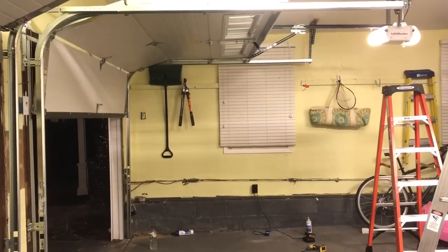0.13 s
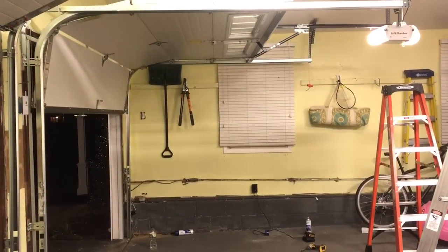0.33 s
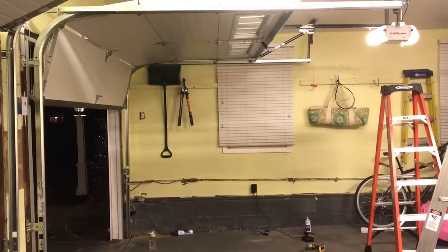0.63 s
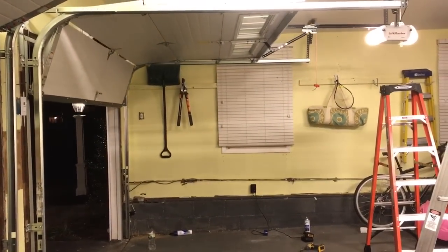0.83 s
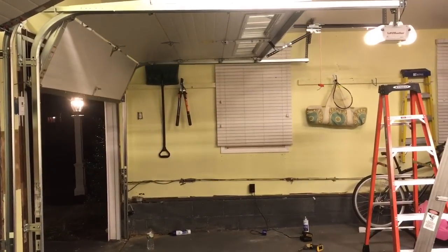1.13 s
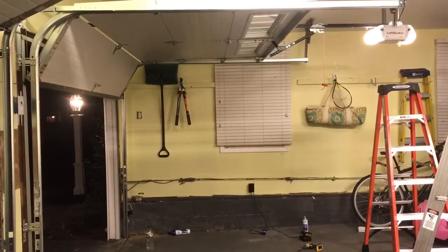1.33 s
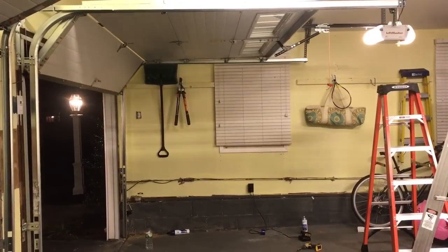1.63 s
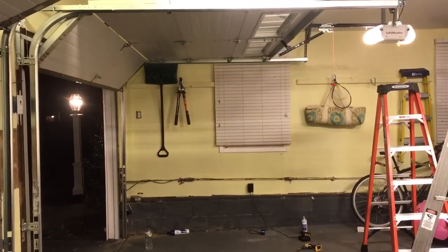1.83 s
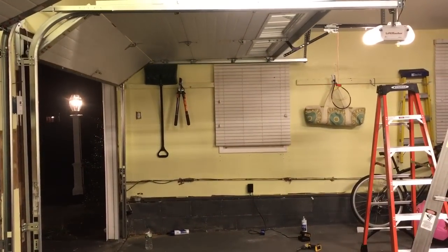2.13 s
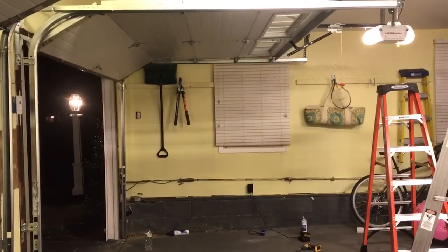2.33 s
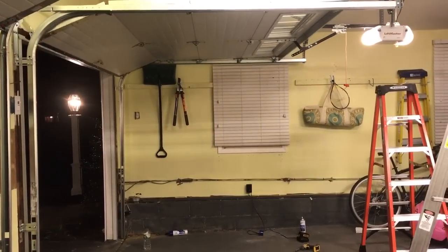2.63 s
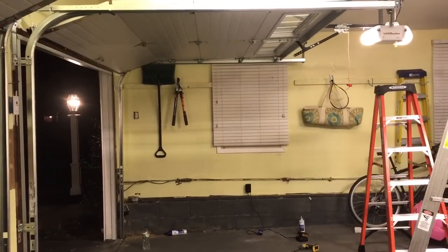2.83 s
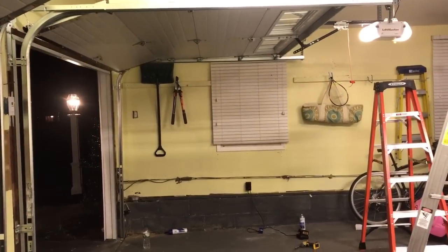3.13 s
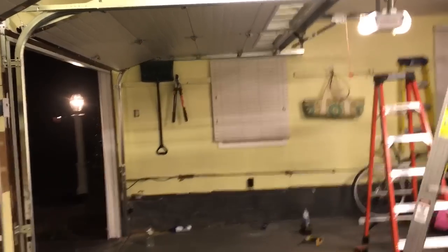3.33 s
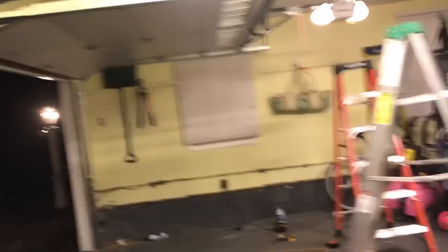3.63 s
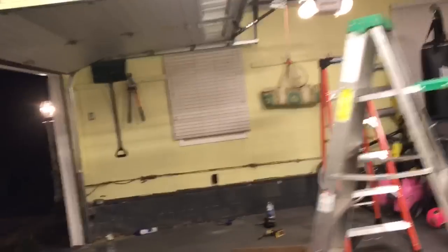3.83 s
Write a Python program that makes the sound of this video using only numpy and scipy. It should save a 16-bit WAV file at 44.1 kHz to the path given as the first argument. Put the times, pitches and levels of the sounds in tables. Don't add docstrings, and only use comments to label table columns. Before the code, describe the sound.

A motorised sectional garage door hums and rattles up its tracks, clanks, then stops.

```python
import sys
import numpy as np
from scipy import signal
from scipy.fft import rfft, irfft, next_fast_len
from scipy.io import wavfile
from scipy.ndimage import uniform_filter1d, map_coordinates

SR = 44100
rng = np.random.default_rng(int(sys.argv[2]) if len(sys.argv) > 2 else 0)


def how_loud(loudness_db):
    steps = np.asarray(loudness_db, float) / 20
    return 10 ** steps


def generate_wav(sig):
    pcm = np.round(np.clip(np.atleast_2d(sig).T, -1, 1) * 32767).astype(np.int16)
    wavfile.write(sys.argv[1], SR, pcm)


N = 176400
OFF_S = 2.875


def unit(x):
    return x / np.sqrt(np.mean(x ** 2) + 1e-20)


def along(points, hz):
    f, v = np.transpose(points)
    return np.interp(np.log(hz + 1), np.log(f + 1), v)


def curve(rows):
    return np.interp(np.arange(N) / SR, *np.transpose(rows))


def wobble(rate_hz):
    knots = rng.standard_normal(int(N * rate_hz / SR) + 4)
    return map_coordinates(knots, [np.arange(N) * rate_hz / SR])


def filtered(x, response):
    m = next_fast_len(len(x) + 8192)
    return irfft(rfft(x, m) * response(np.fft.rfftfreq(m, 1 / SR)), m)[:len(x)]


def resonance(hz, centre_hz, width_hz):
    return 1 / (1 + ((hz - centre_hz) / width_hz * 2) ** 2)


def peaks_db(rows, hz):
    return sum(db * resonance(hz, c, w) for c, w, db in rows)


def patchy(patchy_db=1.1):
    z = signal.stft(rng.standard_normal(N), nperseg=512)[2]
    field = uniform_filter1d(rng.standard_normal(z.shape), size=9, axis=1)
    field = uniform_filter1d(field, size=5, axis=0)
    return signal.istft(z * how_loud(patchy_db * unit(field)), nperseg=512)[1][:N]


def powered(off_s):
    rundown_t60_s = 0.048
    return how_loud(-60 * np.clip(np.arange(N) / SR - off_s, 0, None) / rundown_t60_s)


def motor_tone(hz, db, flutter_db):
    level = how_loud(db + flutter_db * wobble(14))
    sway_rad = 0.094 * flutter_db * wobble(8.7) + rng.uniform(0, 2 * np.pi)
    return level * np.sin(2 * np.pi * hz * np.arange(N) / SR + sway_rad)


MAINS_HZ = 119.9
# (multiple, level [dB])
HUM_OVERTONES = [(1, 0), (2, -18.5), (3, -29), (4, -34.5), (6, -37.5)]
# (time [s], level [dB])
HUM_LOAD = [(0.0, -32.5), (0.04, -33), (0.09, -35.5), (0.22, -34), (1.7, -32), (1.85, -31), (2.1, -30.5),
            (2.79, -33), (2.86, -34)]


def motor_hum():
    hum = sum(motor_tone(k * MAINS_HZ, db, 0.5 if k == 1 else 1.5) for k, db in HUM_OVERTONES)
    return np.sqrt(2) * how_loud(curve(HUM_LOAD)) * hum * powered(OFF_S)


# (time [s], level [dB])
WHINE_SWELL = [(0.0, -54.5), (0.45, -60), (0.47, -56), (1.34, -59.5), (1.45, -66), (1.92, -55.5),
               (2.06, -63), (2.18, -56), (2.82, -59)]


def slot_whine():
    whine_hz, shaft_hz, whine_db, side_tone_db = 1405, 29.4, -57.5, -15.5
    warble_rad, drift_rad, beat_depth = 0.72, 0.3, 0.45
    beat_peak_s, beat_span_s = 1.85, 0.45
    t = np.arange(N) / SR
    swell_db = curve(WHINE_SWELL)
    turn = 2 * np.pi * shaft_hz * t + 0.5 * wobble(1.95)
    bend = np.exp(-((t - beat_peak_s) / beat_span_s) ** 2)
    beat = 1 + beat_depth * (0.34 + bend) * np.sin(turn)
    phase = 2 * np.pi * whine_hz * t + warble_rad * np.sin(turn) + drift_rad * wobble(7.8)
    slots = how_loud(whine_db + 0.48 * wobble(14)) * beat * np.sin(phase)
    side_tone = motor_tone(whine_hz - MAINS_HZ, whine_db + side_tone_db, 2.2)
    whine = how_loud(swell_db - swell_db.mean()) * (slots + side_tone)
    return np.sqrt(2) * whine * powered(2.83)


# (frequency [Hz], level [dB])
GEAR_TONES = [(290, -60), (410, -63)]


def gears():
    return np.sqrt(2) * sum(motor_tone(hz, db, 4.0) for hz, db in GEAR_TONES) * powered(OFF_S)


# (time [s], level [dB])
DRIVE_EFFORT = [(0, 2.5), (.1, 1), (1, 0.5), (1.5, 1.5), (1.95, -0.5), (2.3, 1.5), (2.75, 0), (2.9, 0.5),
                (2.98, -2.5), (3.1, -10), (3.4, -40), (4, -41)]
# (frequency [Hz], density [dB per Hz])
RUMBLE_COLOUR = [(18, -33), (30, -39), (55, 9.5), (100, 6), (140, 2), (200, 6.5), (390, 2), (450, -13),
                 (650, -49)]
# (frequency [Hz], density [dB per Hz])
ROLL_COLOUR = [(260, -33), (450, -4), (606, -4), (736, -2.5), (1260, -11.5), (1420, -4.5), (1770, -10.5),
               (3160, -13.5), (15800, -29)]
# (centre [Hz], width [Hz], level over the rest [dB])
RAIL_MODES = [(730, 100, 7), (960, 150, 5.5), (1180, 240, 5.5), (1740, 55, -2), (3170, 310, 4.5),
              (4500, 88, 6.5), (5760, 430, 2.5)]


def door():
    rumble_db, roll_db, chatter_db, roll_growth = -49, -55, -76.5, 1.5
    taps_per_s, tap_spread_db = 400, 3
    effort_db = curve(DRIVE_EFFORT)
    rumble = unit(filtered(patchy(), lambda hz: how_loud(along(RUMBLE_COLOUR, hz))))
    rail = lambda hz: how_loud(along(ROLL_COLOUR, hz) + peaks_db(RAIL_MODES, hz))
    roll = unit(filtered(patchy(), rail))
    tap_gain = how_loud(tap_spread_db * rng.exponential(size=N).clip(0, 3))
    taps = (rng.random(N) < taps_per_s / SR) * tap_gain * rng.standard_normal(N)
    chatter = unit(filtered(signal.lfilter([1], [1, -0.6], taps), rail))
    rumble = how_loud(rumble_db + effort_db + 1.5 * wobble(8.7)) * rumble
    rollers = how_loud(roll_db) * roll + how_loud(chatter_db) * chatter
    return rumble + how_loud(roll_growth * effort_db + 0.33 * wobble(6.6)) * rollers


# (time [s], peak [dB], tilt [dB per octave], panel boom [dB], crack [dB])
HINGE_BLOWS = [(1.2805, -47.5, -2, 8, 1), (1.3498, -46, 1.5, 8, -2), (1.5001, -40.5, 2, 3.5, -18),
               (1.5802, -45, -2.5, 9, 8), (1.7, -45.5, 2.5, 4, -16), (1.7745, -39, 0.5, 4, -16),
               (2.1664, -36.5, 0, 1.5, -5), (2.2058, -44, 0.5, -7, -4), (2.2893, -29, 2.5, 7, -0.5),
               (2.4236, -31, 1, 7.5, -3), (2.5493, -35.5, -3.5, 7, 2), (2.582, -29.5, -1, 5, -0.5),
               (2.629, -40, -4.5, 5, 13), (2.81, -50.5, 10, 7, -11), (2.86, -43, -5, 10, -13),
               (3.141, -63, 0, 3, 11)]
BOOM_HZ = [3000, 1850, 1900, 1860, 3000, 3150, 1500, 1540, 860, 800, 1023, 2370, 2000, 3000, 2180, 750]
# (frequency [Hz], density [dB per Hz])
BLOW_COLOUR = [(320, -2), (550, -11), (912, -2.5), (1300, -3), (1790, -9), (2540, -9), (6340, -14),
               (11400, -30), (15800, -51)]
# (centre [Hz], width [Hz], level [dB])
STEEL_MODES = [(800, 69, 1), (1120, 66, 1.5), (1500, 200, 3.5), (1810, 94, 3), (1930, 110, 4),
               (3400, 120, -0.5), (4040, 130, -3.5), (4520, 120, -2), (5410, 120, -15), (6400, 550, 2),
               (8200, 330, 2), (11000, 840, 9)]
# (frequency [Hz], t60 [s])
GARAGE_DECAY = [(300, 0.49), (1000, 0.58), (4000, 0.58), (12000, 0.33)]


def hinge_crack(t, snap_db):
    hold_s, t60_s, bright_db_per_oct, echo_s, echo_db = 0.01, 0.014, 3.5, 0.0165, -3.5
    crack = how_loud(-1 + snap_db - 60 * (t - hold_s).clip(0) / t60_s) * rng.standard_normal(len(t))
    crack = filtered(crack, lambda hz: how_loud(bright_db_per_oct * np.log2((hz + 300) / 4000)))
    return crack + how_loud(echo_db) * np.roll(crack, round(echo_s * SR))


def hinge_wash(t):
    lull_s, lull_width_s, lull_db, rattle_db = 0.0145, 0.002, -9, 0.5
    hz, frame_s, z = signal.stft(rng.standard_normal(len(t)), SR, nperseg=128)
    decay = how_loud(-60 * frame_s / along(GARAGE_DECAY, hz)[:, None])
    wash = signal.istft(z * decay, SR, nperseg=128)[1][:len(t)]
    treble = filtered(wash, lambda f: 1 / (1 + (4500 / (f + 1)) ** 4))
    lull = how_loud(lull_db * np.exp(-((t - lull_s) / lull_width_s) ** 2))
    wash = wash + treble * (lull - 1)
    return wash * how_loud(rattle_db * wobble(66)[:len(t)])


def clanks():
    mode_spacing_hz, mode_scatter_db = 45, 3.5
    out, t = np.zeros(N + SR), np.arange(SR // 2) / SR
    sheet = rng.standard_normal(400)
    for (s, db, tilt_db, boom_db, snap_db), boom_hz in zip(HINGE_BLOWS, BOOM_HZ):
        scatter = rng.uniform(-0.94, 1, len(STEEL_MODES))
        steel = [(c, w, level + 2 * a) for (c, w, level), a in zip(STEEL_MODES, scatter)]
        struck = (sheet + rng.standard_normal(len(sheet))) / np.sqrt(2)

        def metal(hz):
            tilt = tilt_db * np.log2((hz + 300) / 4000)
            boom = boom_db * np.exp(-(np.log2((hz + 1) / boom_hz) / 0.38) ** 2)
            modes = mode_scatter_db * np.interp(hz / mode_spacing_hz, np.arange(len(struck)), struck)
            return how_loud(along(BLOW_COLOUR, hz) + tilt + boom + peaks_db(steel, hz) + modes)

        blow = filtered(hinge_wash(t) + hinge_crack(t, snap_db), metal)
        blow = blow / np.std(blow[:2048]) * np.clip(t / 0.001, 0, 1)
        out[round(s * SR):][:len(t)] += how_loud(db - 12) * blow
    return out[:N]


# (time [s], pitch [Hz], peak [dB], t60 [s])
SNAPS = [(2.0753, 6200, -55, .02), (2.0824, 5760, -58, .02), (2.092, 8500, -48, .015),
         (2.168, 10900, -50, .012), (2.177, 6500, -48, .015), (2.2913, 11300, -39, .012),
         (2.2915, 6400, -44, .015), (2.307, 8400, -51, .025), (2.307, 11300, -51, .03),
         (2.326, 4100, -40.5, .02), (2.4245, 9560, -46, .01), (2.431, 6760, -44, .015),
         (2.446, 4700, -44, .02), (2.464, 4780, -43, .03), (2.5828, 6900, -41, .015),
         (2.584, 2500, -37, .02), (2.604, 2000, -40, .03), (3.1415, 800, -53, .03),
         (3.181, 1190, -59, .015), (3.251, 1000, -59, .015), (3.478, 900, -59, .015),
         (2.168, 1540, -46, 0.14), (2.207, 1500, -45, .12), (2.2915, 832, -39.5, 0.088),
         (2.2925, 1084, -41, 0.077), (2.3, 1960, -43, .08), (2.432, 828, -43, 0.071),
         (2.585, 900, -51, .06), (2.5825, 12500, -48, .02), (2.584, 1500, -47, .08),
         (2.586, 2000, -46, 0.068), (3.7418, 9400, -46, 0.014), (3.741, 1140, -54, 0.013),
         (3.7525, 4500, -51, .015), (3.7535, 5860, -53, .015), (3.768, 4000, -56, .01),
         (3.779, 4500, -54, .015), (3.806, 13000, -58, .02), (3.819, 4500, -60, .015)]


def snaps():
    spread, attack_s = 0.025, 0.00059
    out, t = np.zeros(N + SR), np.arange(SR // 8) / SR
    for (s, hz, db, t60), chance in zip(SNAPS, rng.standard_normal((len(SNAPS), 3))):
        pitches_hz = hz * (1 + spread * (chance - chance.mean())[:, None])
        ring = np.sin(2 * np.pi * pitches_hz * t).sum(axis=0) / 2
        out[round(s * SR):][:len(t)] += how_loud(db - 60 * t / t60) * np.clip(t / attack_s, 0, 1) * ring
    return out[:N]


# (time [s], frequency [Hz], level [dB], half length [s])
BOOMS = [(0.093, 64, -43, 0.055), (0.6, 66, -43, 0.054), (0.71, 58, -38.5, .07), (0.789, 72, -41, .05),
         (0.26, 64, -42, .05), (1.289, 100, -42, .04), (1.79, 62, -47, .05), (2.6, 99, -44, .04),
         (3.138, 80, -47, 0.019), (3.9, 55, -50, 0.039), (3.8, 117, -56, 0.064), (0.937, 750, -46.5, 0.014),
         (1.301, 750, -50, .012), (1.4, 747, -48.5, 0.012), (2.076, 60, -44, 0.039), (2.7, 99, -44, 0.17),
         (2.836, 280, -49.5, 0.048), (2.835, 390, -50, 0.046), (2.8, 200, -49, .09), (1.0, 375, -51.5, .08),
         (2.921, 110, -41.5, 0.02), (2.987, 113, -37.5, 0.023), (3.056, 95, -42, 0.015),
         (2.999, 300, -59.5, 0.076), (3.08, 240, -55, 0.036), (3.248, 77.6, -48.5, 0.04),
         (3.5, 62, -51, 0.022)]


def thumps():
    t = np.arange(N) / SR
    burst = lambda s, hz, half_s: np.exp(-((t - s) / half_s) ** 2) * np.sin(2 * np.pi * hz * (t - s))
    return sum(how_loud(db) * burst(s, hz, half_s) for s, hz, db, half_s in BOOMS)


def rail_sing():
    hz, level_db, t60_s, rise_s, flutter_db = 750, -59.5, 2.0, 0.2, 2.5
    since = np.arange(N) / SR - OFF_S
    level = how_loud(level_db + flutter_db * wobble(18) - 60 * since.clip(0) / t60_s)
    tone = np.sin(2 * np.pi * hz * since + 0.36 * wobble(19))
    return level * np.clip(since / rise_s, 0, 1) * tone


# (start [s], length [s], level [dB], fade t60 [s])
SLIDES = [
    (2.072, 0.054, -51, 0.49),
    (3.735, 0.018, -59.5, 0.12),
    (3.748, 0.025, -60, 0.67),
]
# (frequency [Hz], density [dB per Hz])
SLIDE_COLOURS = [
    [(400, -25), (600, 5), (1500, 4), (3500, -11), (6200, 4.5), (9000, -7), (11000, -14), (15000, -15)],
    [(530, -32.5), (900, -3), (4230, -8), (6590, -5), (7790, -14), (9440, -2.5), (15800, -12)],
    [(530, -33), (900, -4), (1780, -11.5), (4490, -10.5), (5180, -10), (5840, -9), (15800, -18)],
]


def scrapes():
    grit_db, grip_s = 2.4, 0.004
    t, out = np.arange(N) / SR, 0
    for (s, length_s, db, t60), colour in zip(SLIDES, SLIDE_COLOURS):
        grit = rng.standard_normal(N) * how_loud(grit_db * wobble(80))
        grit = unit(filtered(grit, lambda hz: how_loud(along(colour, hz))))
        fade = how_loud(db - 60 * np.clip(t - s - length_s, 0, None) / t60)
        out = out + grit * np.clip((t - s) / grip_s, 0, 1) * fade
    return out


# (frequency [Hz], density [dB per Hz])
AIR_COLOUR = [(18, -21), (30, -5), (80, 5), (160, -7), (500, -22), (900, -19.5), (2200, -36), (15800, -42)]
# (time [s], swell [dB])
FAR_TRAFFIC = [(0, 1.5), (3.1, 2.5), (3.3, 1), (3.5, -3.5), (3.6, -3.5), (3.72, 2.5), (3.85, -0.5),
               (4, -3.5)]
# (centre [Hz], width [Hz], level [dB])
FAR_DRONES = [(750, 200, -88), (910, 25, -77.5), (11700, 150, -91)]


def room_tone():
    air = unit(filtered(patchy(), lambda hz: how_loud(along(AIR_COLOUR, hz))))
    bass = filtered(air, lambda hz: 1 / (1 + (hz / 160) ** 4))
    air = air + bass * (how_loud(curve(FAR_TRAFFIC)) - 1)
    out = how_loud(-53.5 + 0.67 * wobble(4.7)) * air
    for c, w, db in FAR_DRONES:
        drone = unit(filtered(rng.standard_normal(N), lambda hz: resonance(hz, c, w)))
        out = out + how_loud(db + 4.9 * wobble(4.9)) * drone
    return out


def scene():
    opener = motor_hum() + slot_whine() + gears()
    steel = door() + clanks() + snaps() + thumps() + rail_sing()
    return (opener + steel + scrapes() + room_tone())[None]


def top_cut(x):
    return signal.sosfilt(signal.butter(12, 15860, fs=SR, output="sos"), x)


# (centre [Hz], width [Hz], level [dB])
MIC_DIPS = [(4880, 280, -4.5), (7650, 1200, -3.5), (10360, 1650, -4.5)]


def record(dry):
    top_hz = 15850
    mic = lambda hz: (hz < top_hz) * how_loud(peaks_db(MIC_DIPS, hz))
    mix = filtered(dry[0], mic)[None]
    return top_cut(mix)


dry = scene()
out = record(dry)
generate_wav(out)
```